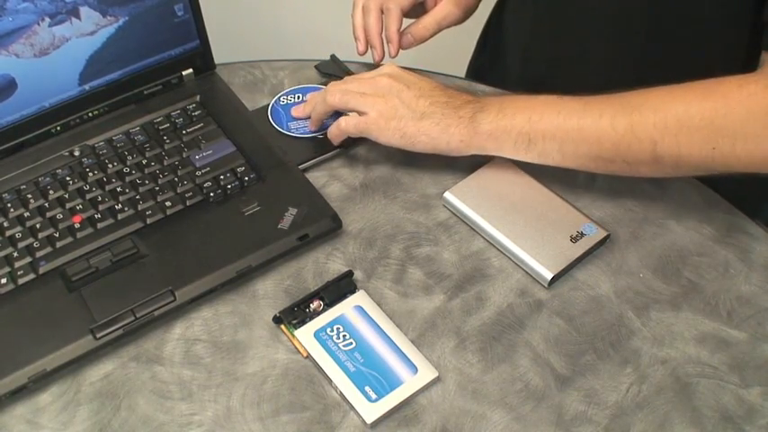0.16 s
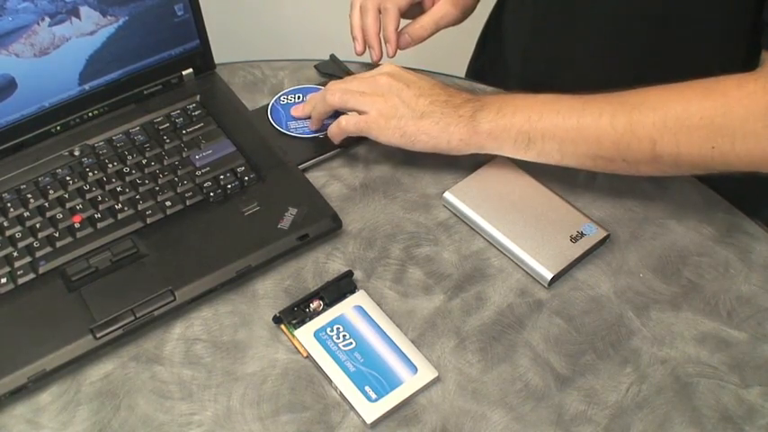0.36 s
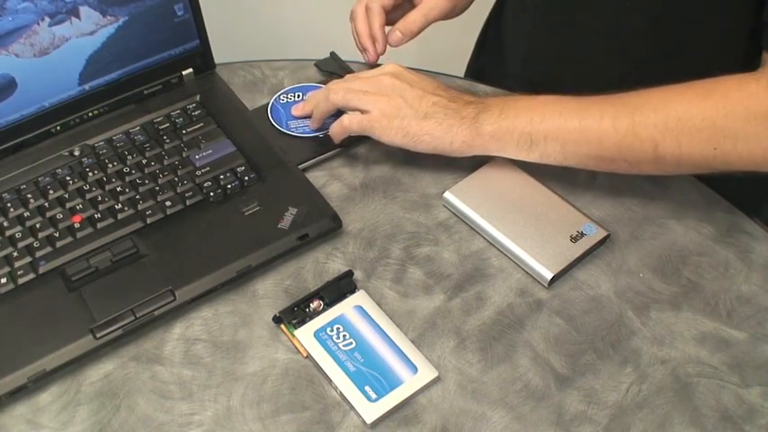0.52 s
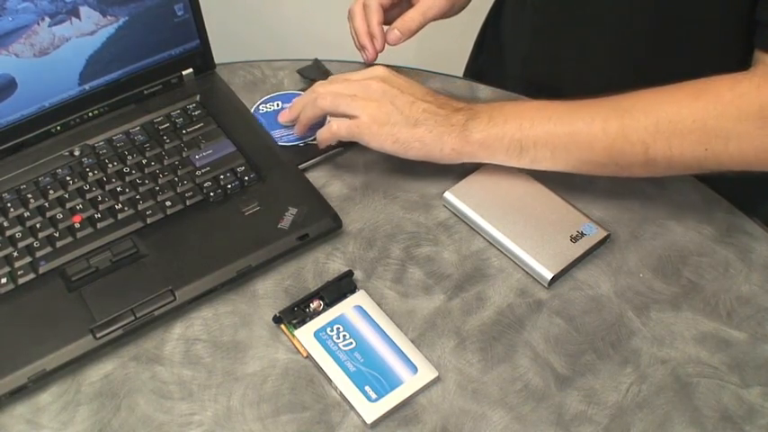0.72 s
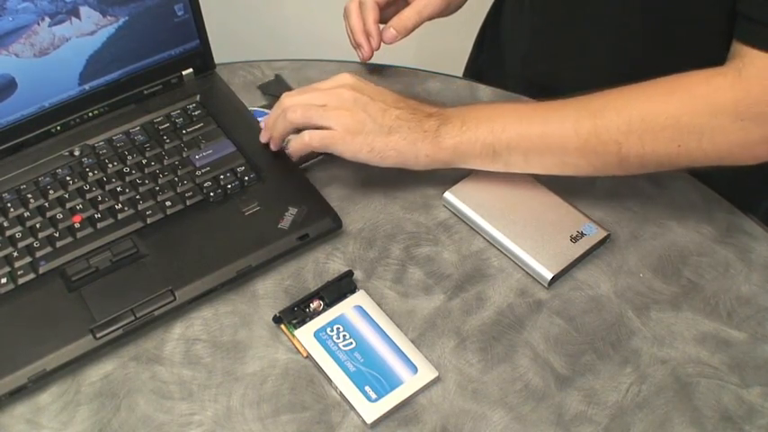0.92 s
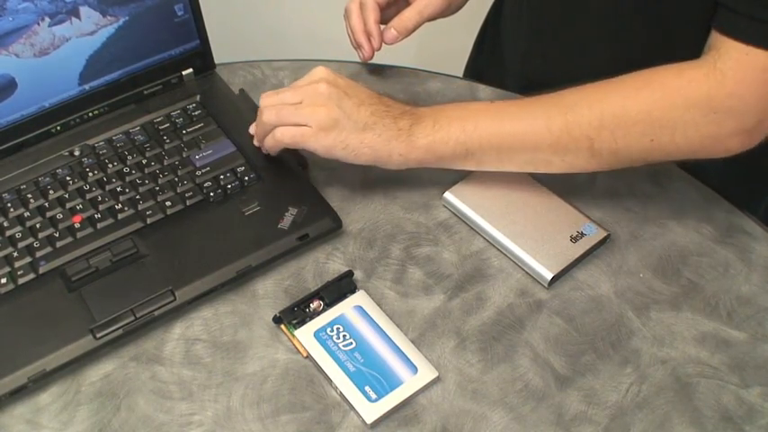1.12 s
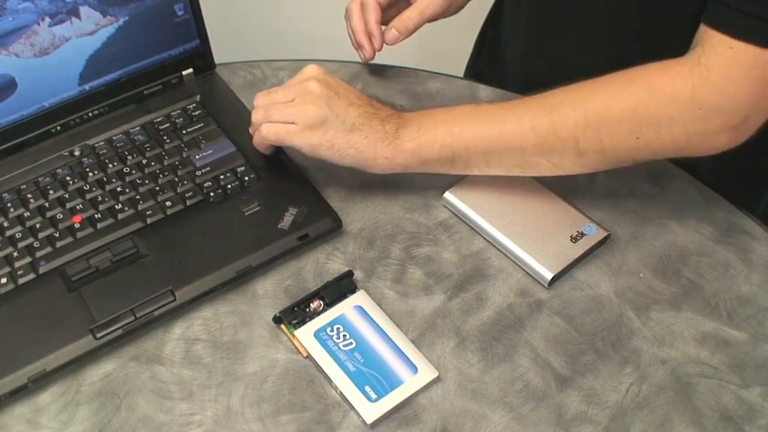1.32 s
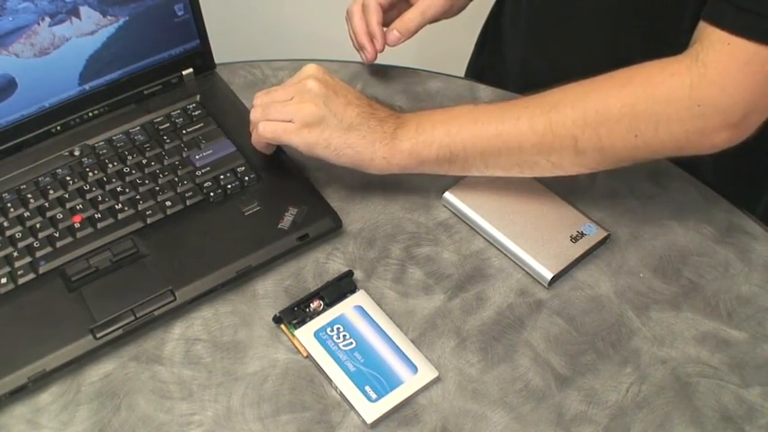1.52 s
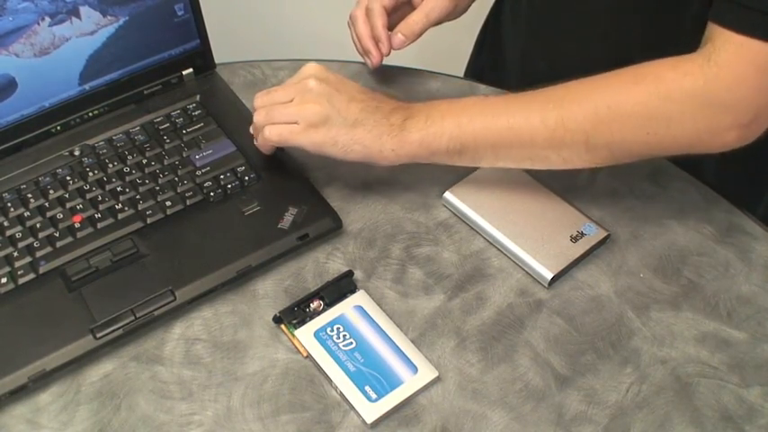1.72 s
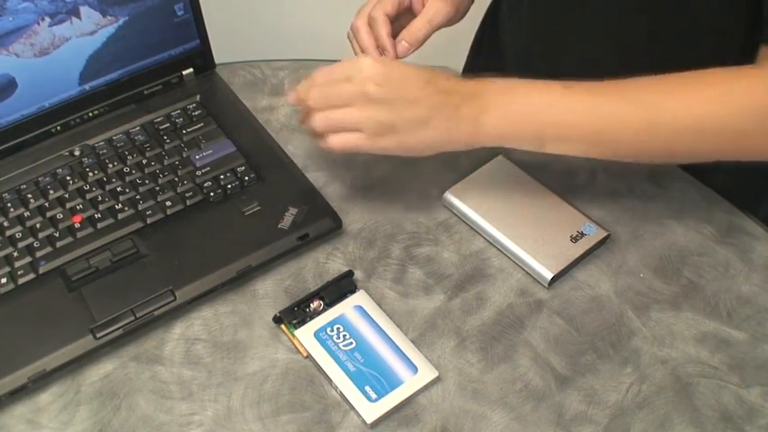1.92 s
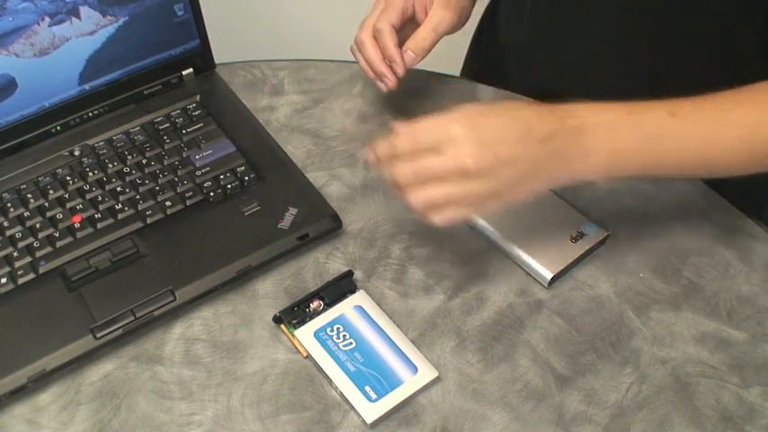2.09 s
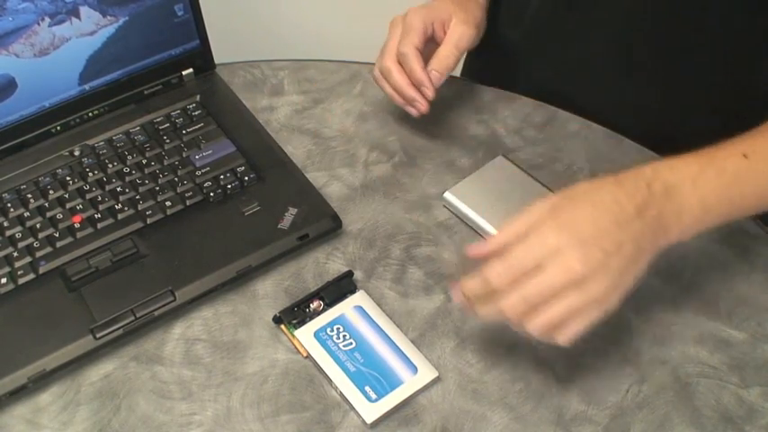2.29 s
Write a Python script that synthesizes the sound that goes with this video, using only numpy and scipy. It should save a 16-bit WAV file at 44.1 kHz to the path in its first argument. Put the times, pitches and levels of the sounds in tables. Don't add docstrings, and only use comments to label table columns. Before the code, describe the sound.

A disc snaps onto a laptop drive hub at 0.25 s, a loud, bright cluster of plastic cracks with short room reverberation. Faint ticks begin near 0.67 s; a sharp knock at 0.99 s starts the tray rubbing inward, with small bright clicks at 1.2 s and a firm latching clack at 1.45 s. A soft hand brush follows around 1.9-2.1 s, over low fan hum and faint hiss.

```python
import sys
import numpy as np
from scipy import signal
from scipy.fft import rfft, irfft
from scipy.io import wavfile

SR = 44100
rng = np.random.default_rng(int(sys.argv[2]) if len(sys.argv) > 2 else 0)


def amplitude_ratio(level_db):
    exponent = np.asarray(level_db, float) / 20
    return 10 ** exponent


def bounce(signal):
    frames = np.transpose(np.atleast_2d(signal))
    limited = np.clip(frames, -1, 1)
    pcm = np.round(limited * 32767).astype(np.int16)
    wavfile.write(sys.argv[1], SR, pcm)


N = 103635


def rms_one(x):
    return x / np.sqrt(np.mean(x ** 2) + 1e-20)


def at_hz(points, hz):
    table = np.array(points)
    return np.interp(np.log(hz), np.log(table[:, 0]), table[:, 1])


def colour(x, points):
    size = 4096
    log_gain = np.log(amplitude_ratio(at_hz(points, np.arange(size // 2 + 1) * SR / size + 1)))
    cepstrum = irfft(log_gain)
    cepstrum[1:size // 2] *= 2
    cepstrum[size // 2 + 1:] = 0
    impulse = irfft(np.exp(rfft(cepstrum)))
    return signal.fftconvolve(x, impulse)[:len(x)]


def drift(rate_hz):
    step = 40
    pole = np.exp(-2 * np.pi * step * rate_hz / SR)
    settle = 2000
    noise = rng.standard_normal(N // step + settle + 2)
    slow = signal.lfilter([1], [1, -2 * pole, pole * pole], noise)[settle:]
    return np.interp(np.arange(N) / step, np.arange(len(slow)), rms_one(slow))


def ring(x, hz, t60):
    radius = amplitude_ratio(-60 / (t60 * SR))
    angle = 2 * np.pi * hz / SR
    return signal.lfilter([0, np.sin(angle)], [1, -2 * radius * np.cos(angle), radius ** 2], x + 1e-18)


def bands(gain):
    # f/Hz, correlation [1]
    likeness = [(30, 0.95), (150, 0.95), (400, 0.32), (1000, 0.29), (3000, 0.44), (7000, 0.7),
                (10000, 0.27), (12500, .999)]
    edges_hz = 20 * 2 ** np.arange(0, 10, .5)
    white = rng.standard_normal((2, 2, N))
    out = 0
    for k, (low, high) in enumerate(zip(edges_hz, edges_hz[1:])):
        band = signal.butter(2, [low, high], "band", fs=SR, output="sos")
        mid, side = signal.sosfilt(band, white[k % 2])
        hz = np.sqrt(low * high)
        alike = np.clip(at_hz(likeness, hz), -1, 1)
        stereo = np.sqrt(1 + alike) * mid + np.sqrt(1 - alike) * side * [[1], [-1]]
        out = out + gain(hz) * stereo
    return out


def fan_hum():
    # f/Hz, width/Hz, level/dB
    modes = [(178.4, 20, -62), (121.4, 26, -70), (75.1, 9.2, -67.5)]
    hum = 0
    for hz, width, db in modes:
        once = ring(rng.standard_normal(N), hz, 2.5 / width)
        hum = hum + amplitude_ratio(db) * rms_one(ring(once, hz, 2.5 / width))
    return hum


def background():
    # f/Hz, level/dB
    air_colour = [(25, -12), (70, -5), (180, -3), (400, -6.5), (1200, -9.5), (4000, -20.5), (12000, -27),
                  (16000, -10)]
    air = rms_one(bands(lambda hz: amplitude_ratio(at_hz(air_colour, hz) + 0.92 * drift(2.7))))
    return amplitude_ratio(-54) * air + fan_hum()


def strike(push, hz, crack_db, crack_colour):
    crack = colour(push, crack_colour)
    part = ring(crack, hz, t60=.0045)
    return rms_one(part) + amplitude_ratio(crack_db) * rms_one(crack)


def contacts(hits, crack_colour):
    ticks_per_s, tick_spread_db, rise_s = 12000, 4.0, 0.00055
    size = N + SR
    out = np.zeros((2, size))
    t = np.arange(SR // 5) / SR
    ticks = (rng.random(size) < ticks_per_s / SR) * amplitude_ratio(tick_spread_db * rng.standard_normal(size))
    ticks = ticks * rng.choice([-1, 1], size)
    for s, db, hz, crack_db, t60 in hits:
        i = int(s * SR)
        envelope = np.minimum(t / rise_s, 1) * amplitude_ratio(-60 * t / max(t60, .004))
        chatter = strike(ticks[i:i + len(t)] * envelope, hz, crack_db, crack_colour)
        blow = strike(1. * (t == 0), hz, crack_db, crack_colour)
        out[:, i:i + len(t)] += amplitude_ratio(db) * np.array([chatter, blow]) / np.abs(chatter).max()
    return out[:, :N]


def disc_snap():
    # t/s, peak level/dB, part f/Hz, crack over ring/dB, chatter t60/s
    disc_hits = [
        (.1935, -35.5, 1580, -11.5, 0.022),
        (.2440, -38, 1940, 16, 0.041),
        (.2460, -7, 2030, -1.5, 0.032),
        (.2493, -3, 1970, -1.5, 0.011),
        (.2505, -10, 6600, 0, .015),
        (.2528, -3.5, 1610, 3.5, 0.025),
        (.2565, -9.5, 2060, -5, 0.028),
        (.2670, -12, 1600, 7, 0.034),
    ]
    # f/Hz, level/dB
    disc_crack = [(300, -15), (800, -12.5), (1400, -3), (3000, 7.5), (6500, 3), (9000, -1), (13000, -1.5),
                  (16000, -36)]
    return contacts(disc_hits, disc_crack)


def thuds():
    # t/s, level/dB, f/Hz, t60/s
    modes = [(.1940, -44, 990, .03), (.2500, -21, 1500, 0.045), (0.2508, -22, 6330, .03),
             (0.252, -32.5, 970, .03), (.2520, -34, 650, 0.048), (0.256, -44, 260, 0.1),
             (.6670, -41, 695, 0.046), (0.753, -38, 964, 0.028), (0.9863, -26, 1886, 0.027),
             (.9870, -38, 640, .04), (.9880, -45, 327, 0.036), (.9930, -47, 259, 0.12),
             (1.2075, -30, 3190, 0.027), (1.3283, -43, 5360, .012), (1.4488, -25, 2240, .025),
             (1.4490, -33.5, 620, 0.047), (1.4516, -32, 915, 0.057), (1.4540, -42, 256, 0.11),
             (1.4600, -42, 141, 0.11), (1.9060, -48, 245.4, .2)]
    swell_cycles = 1.1
    t = np.arange(N) / SR
    out = np.zeros(N)
    for s, db, hz, t60 in modes:
        age = np.maximum(t - s, 0)
        swell = 1 - np.exp(-age * hz / swell_cycles)
        out += amplitude_ratio(db - 60 * age / t60) * swell * np.sin(2 * np.pi * hz * age)
    return out


def room(x):
    # f/Hz, t60/s
    room_t60 = [(200, 0.12), (530, 0.58), (1600, 0.43), (3700, 0.49), (9700, .45), (14000, .3)]
    # f/Hz, level/dB
    room_colour = [(200, 13.5), (1800, -1), (5000, 1.5), (14000, -3)]
    tail_db, gap_s = -11, 0.022
    desk_db, desk_t60_s, desk_side_db = -3.5, 0.078, -15
    t = np.arange(N) / SR

    def decay(hz):
        t60 = at_hz(room_t60, hz)
        return amplitude_ratio(at_hz(room_colour, hz) - 60 * t / t60) / np.sqrt(t60)

    tail = bands(decay) * np.clip(t / gap_s - .4, 0, 1)
    mid, side = rng.standard_normal((2, N)) * amplitude_ratio(-60 * t / desk_t60_s) * (t > .0012)
    desk = mid + amplitude_ratio(desk_side_db) * side * [[1], [-1]]
    echo = amplitude_ratio(tail_db) * rms_one(tail) + amplitude_ratio(desk_db) * rms_one(desk)
    return signal.fftconvolve(x[None], echo / np.sqrt(N), axes=1)[:, :N]


def friction(curve, tone):
    clump_db, grains_per_s = 2.2, 4000
    grains = (rng.random(N) < grains_per_s / SR) * rng.standard_normal(N)
    grains = grains * amplitude_ratio(clump_db * drift(34))
    level_db = np.interp(np.arange(N) / SR, *np.transpose(curve), left=-90, right=-90)
    return amplitude_ratio(level_db) * rms_one(colour(grains, tone))


def tray_rub():
    # t/s, level/dB
    rub_curve = [(0, -80), (.62, -66), (.84, -61), (.865, -56), (.97, -55.5), (1.1, -59), (1.3, -59),
                 (1.6, -57), (1.75, -102), (2.35, -101)]
    # f/Hz, level/dB
    rub_colour = [(250, -16.5), (600, -4), (1800, 2.5), (3000, -2.5), (6000, -5.5), (11000, -12.5),
                  (16000, -37)]
    return friction(rub_curve, rub_colour)


def tray_knocks():
    # t/s, peak level/dB, part f/Hz, crack over ring/dB, chatter t60/s
    tray_hits = [(.6659, -33.5, 3040, 4, 0.11), (.7522, -33.5, 1890, -9, 0.0081),
                 (.8565, -51, 2160, 6, 0.15), (.9373, -38, 2900, 6, 0.027), (.9850, -15, 4600, 8, .010),
                 (.9866, -16.5, 2040, -5.5, 0.011), (.9915, -26, 4500, 16, 0.028),
                 (1.3284, -32, 2596, -3.5, 0.017), (1.4042, -23, 1890, 5, 0.013),
                 (1.4100, -29.5, 1860, 7, 0.051), (1.4484, -12, 2240, -2, 0.028),
                 (1.4530, -21, 3470, -0.5, 0.028), (1.4575, -17.5, 3000, 8, 0.043),
                 (1.4935, -21.5, 2230, 5, 0.0091), (1.655, -45, 650, -26, 0.011),
                 (1.755, -44.5, 980, -10, .02), (1.8487, -43, 2220, -11, .015),
                 (1.9016, -38.5, 2990, -6.5, 0.043), (1.921, -47.5, 2480, -19.5, 0.015),
                 (2.0522, -43, 1250, -12, .02)]
    # f/Hz, level/dB
    tray_crack = [(200, -25), (600, -8.5), (1500, -10), (2600, -0.5), (4200, 1), (7000, -2), (10500, -8),
                  (16000, -24)]
    return contacts(tray_hits, tray_crack)


def rail_catches():
    # t/s, peak level/dB, part f/Hz, crack over ring/dB, chatter t60/s
    rail_hits = [
        (1.2025, -31, 1510, 22.5, 0.013),
        (1.2063, -19, 6940, 4.5, 0.014),
        (1.2075, -20.5, 3010, -3, 0.016),
        (1.2128, -23, 2850, 13, .015),
        (1.2178, -29, 2880, 4, 0.025),
    ]
    # f/Hz, level/dB
    rail_crack = [(300, -18.5), (1200, -11.5), (2500, -7.5), (4000, 2), (7000, 3.5), (9000, 2.5),
                  (13000, -12), (16000, -39)]
    return contacts(rail_hits, rail_crack)


def hand_brush():
    # t/s, level/dB
    brush_curve = [(1.7, -77.5), (1.76, -65), (1.8, -83), (1.89, -66), (1.902, -54), (1.99, -55),
                   (2.02, -64), (2.075, -63), (2.1, -85)]
    # f/Hz, level/dB
    brush_colour = [(200, -1), (600, 9.5), (1100, 8), (1800, 10), (3200, -5), (6000, -13), (14000, -36)]
    return friction(brush_curve, brush_colour)


def scene():
    floor = background()
    hits = disc_snap() + tray_knocks() + rail_catches()
    near, far = hits + thuds() + tray_rub() + hand_brush()
    return near + room(far) + floor


def top_cut(x):
    return signal.sosfilt(signal.butter(12, 16660, fs=SR, output="sos"), x)


def record(dry):
    top = 1.3
    return top_cut(top * np.tanh(dry / top))


dry = scene()
out = record(dry)
bounce(out)
```